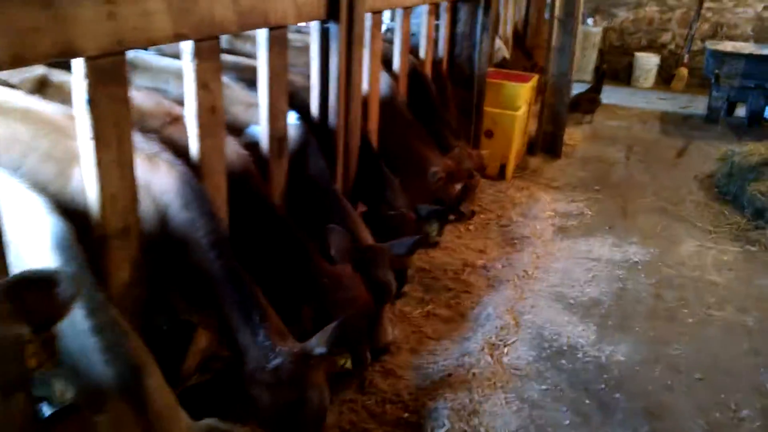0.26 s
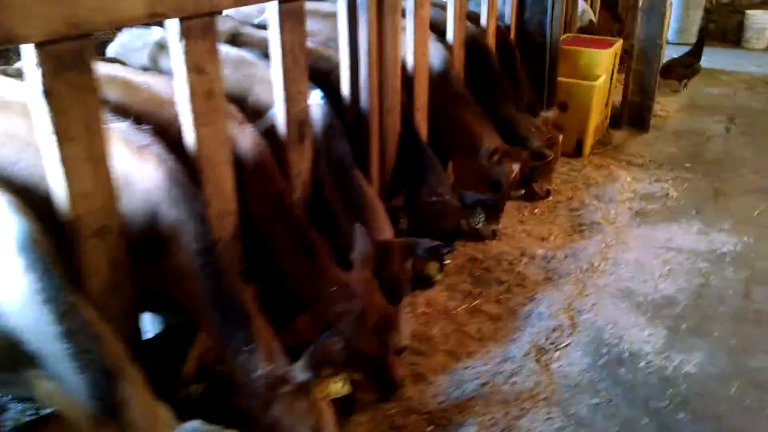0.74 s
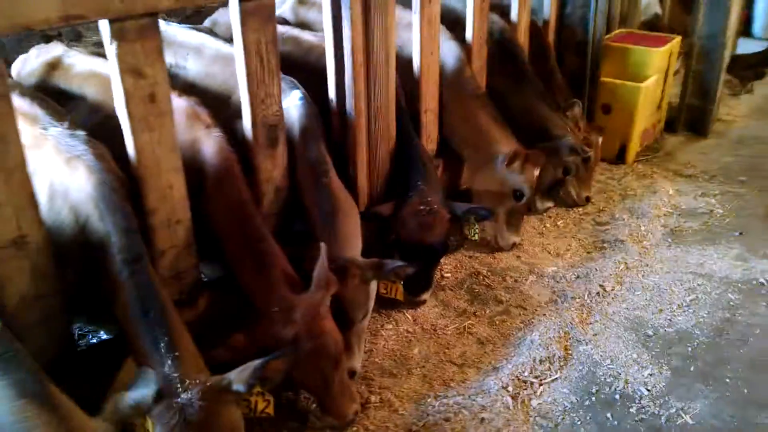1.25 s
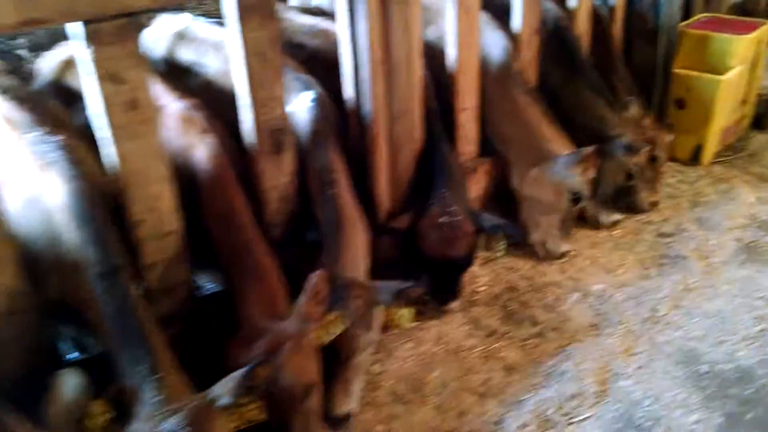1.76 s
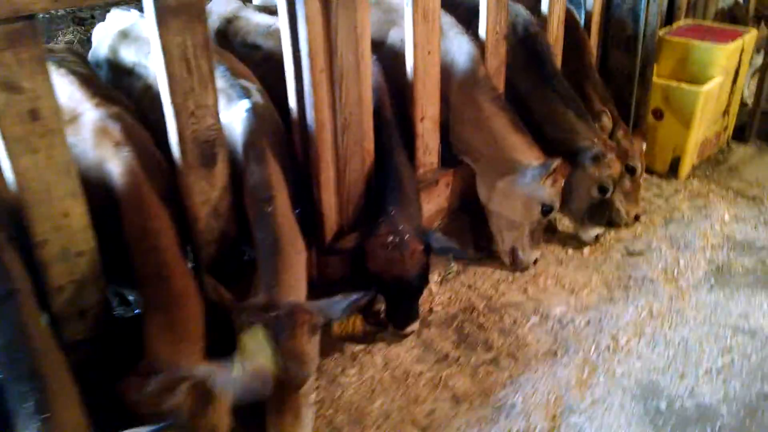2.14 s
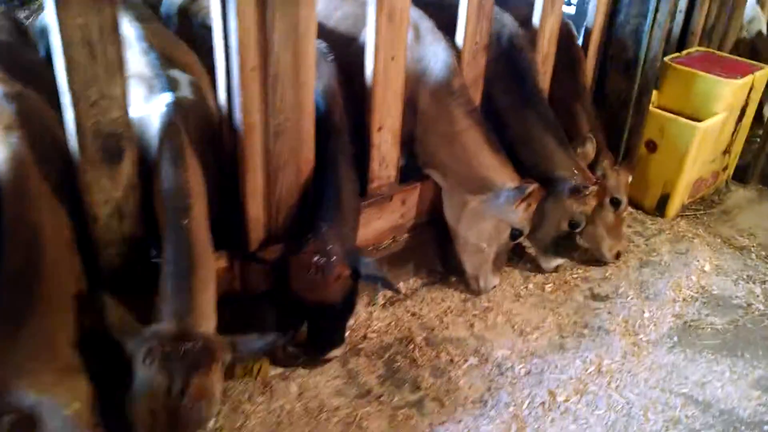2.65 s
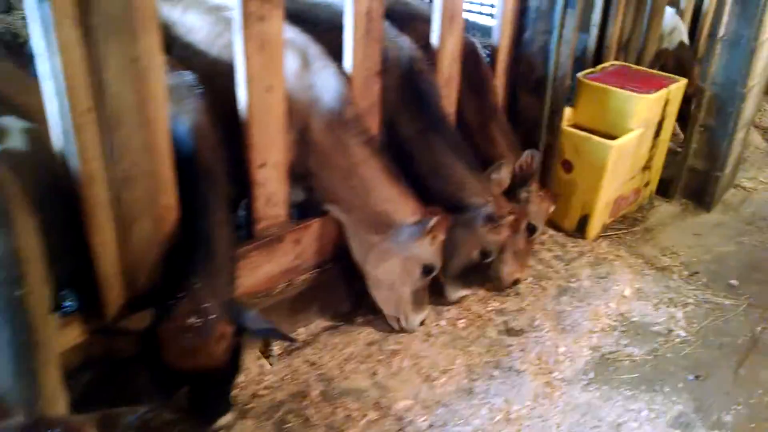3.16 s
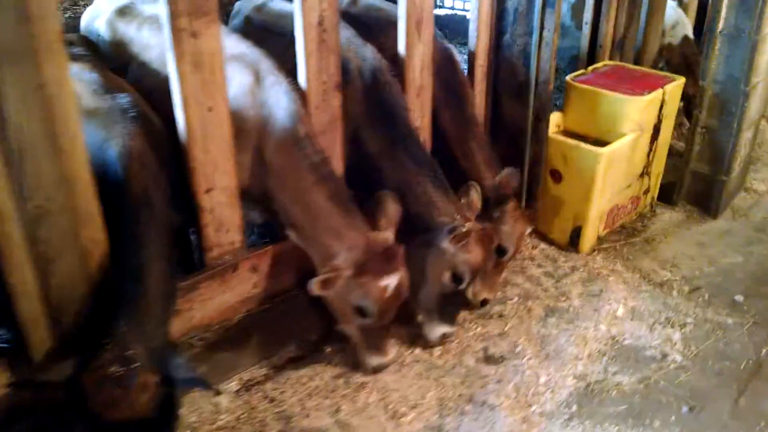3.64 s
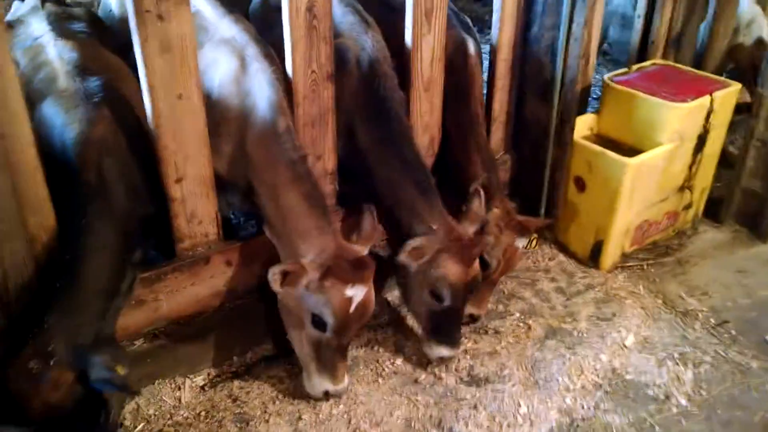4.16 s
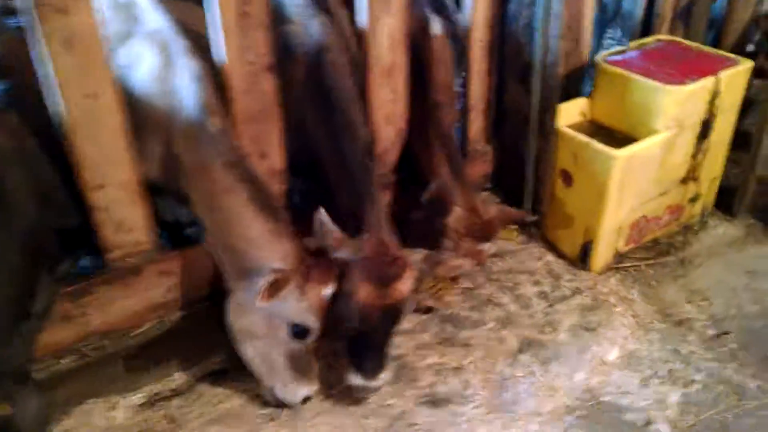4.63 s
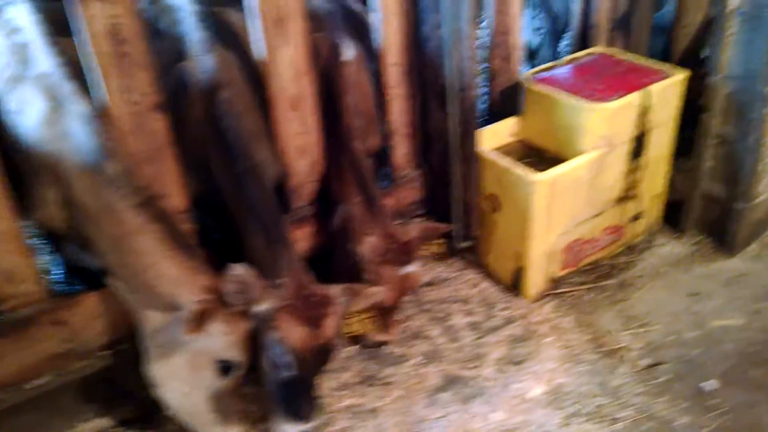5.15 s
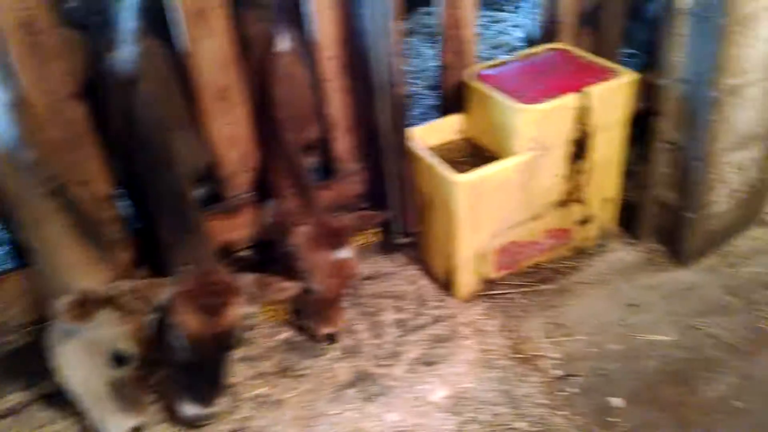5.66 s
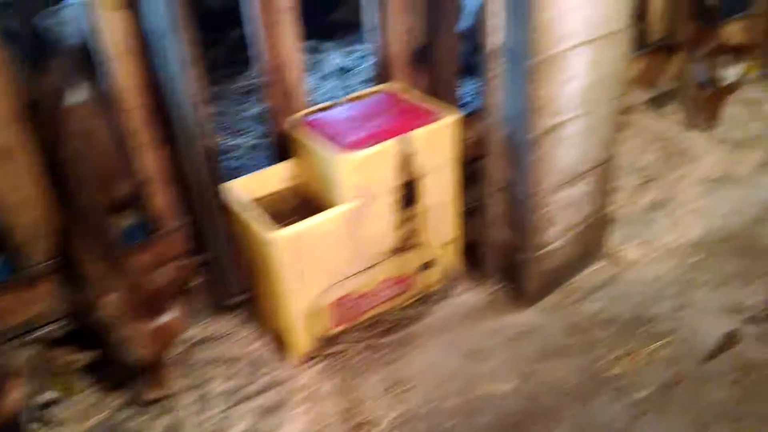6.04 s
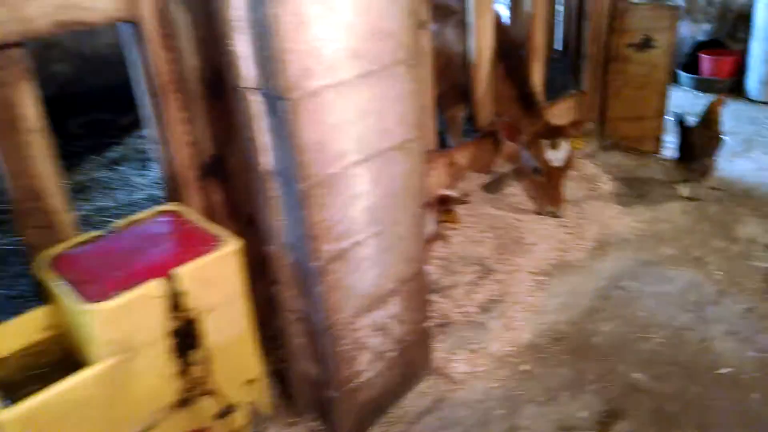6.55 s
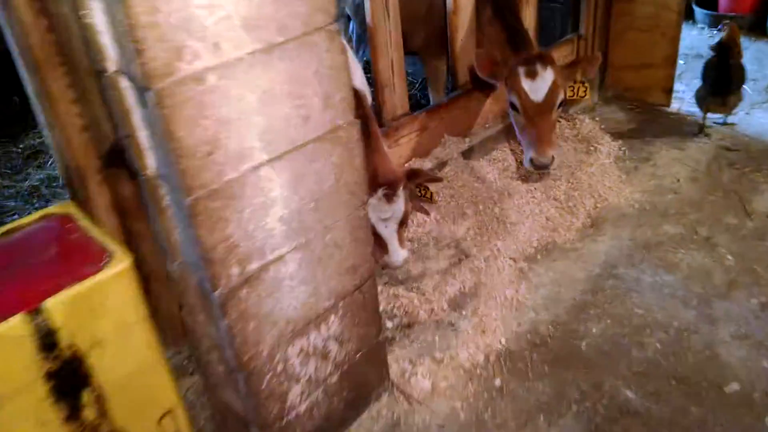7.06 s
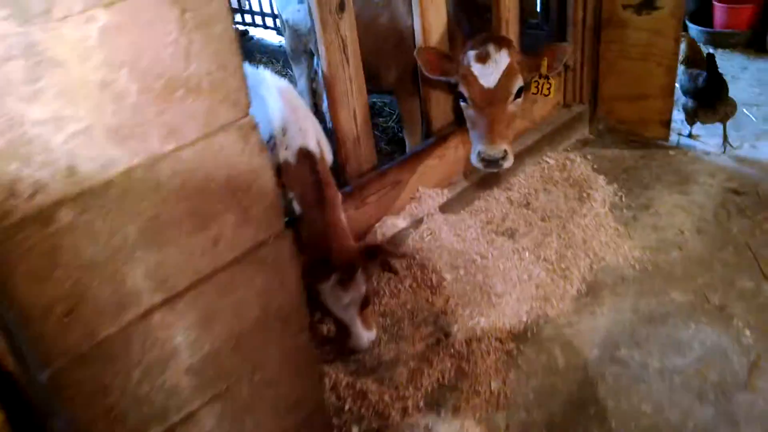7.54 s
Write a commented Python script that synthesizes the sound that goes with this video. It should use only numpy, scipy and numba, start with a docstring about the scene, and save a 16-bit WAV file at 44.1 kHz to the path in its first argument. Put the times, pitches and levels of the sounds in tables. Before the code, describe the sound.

A calf gives a long rising moo in a timber barn, with a faint answer and a short rough call, amid straw rustle and knocks.

```python
"""Calves moo in a timber barn: a long call, a fainter answer, a short call; pulse trains ring moving resonances.
A hum precedes the short call; a far calf grunts, one snorts, boards knock, dry snaps crack: tones and noise bursts.
The herd stirs and rustles in feed and straw (coloured noise), small birds chirp (gliding sines).
Air buffets the two microphone ports (bass noise and short swirls) over barn air.
The phone widens its stereo by feeding each port, late and inverted, into the other side."""
import sys
import numpy as np
from scipy import signal
from scipy.fft import rfft, irfft, next_fast_len
from scipy.io import wavfile
from scipy.ndimage import uniform_filter1d
from numba import njit

SR = 44100
rng = np.random.default_rng(int(sys.argv[2]) if len(sys.argv) > 2 else 0)


def gain_from_db(level_db):
    """Turn a decibel level (scalar or array-like) into a linear amplitude factor."""
    decades = np.asarray(level_db, float) / 20
    return 10 ** decades


def generate_wav(sig):
    """Save sig (samples, or channels by samples) to the path in sys.argv[1] as 16-bit PCM at SR."""
    pcm = np.round(np.clip(np.atleast_2d(sig).T, -1, 1) * 32767).astype(np.int16)
    wavfile.write(sys.argv[1], SR, pcm)


N = 343980
T = np.arange(N) / SR
SIZE = next_fast_len(N)

# calls, before group offsets: (time [s], mean pitch [Hz], throat [dB], mouth [dB], bray [dB])
LONG_MOO = [(1.02, 88.6, -59, -51, -67), (1.18, 97.2, -47, -32.5, -54), (1.27, 102.1, -24, -33, -41),
            (1.35, 105.3, -36, -36, -34), (1.41, 109, -23.5, -32, -34.5), (1.52, 113.2, -27.5, -30, -31),
            (1.69, 119.3, -20, -27.5, -33.5), (1.91, 129.7, -24.5, -28.5, -27.5),
            (1.99, 132.1, -13.5, -18.5, -31.5), (2.05, 133.8, -16, -31.5, -25.5),
            (2.18, 134.6, -18, -22, -24), (2.27, 133.1, -21, -29.5, -40), (2.36, 135.1, -27, -23.5, -29.5),
            (2.53, 143.6, -14, -21.5, -30), (2.6, 147, -12, -22, -33.5), (2.655, 149.7, -22, -42, -34),
            (2.7, 149.4, -12.5, -23.5, -29.5), (2.745, 152.5, -24.5, -33, -35), (2.8, 154.7, -14, -26, -29),
            (2.88, 156.3, -19.5, -29.5, -30), (2.98, 156.8, -16, -24, -25), (3.08, 157.4, -22.5, -29, -29),
            (3.15, 158.5, -11.5, -25, -28.5), (3.22, 158.3, -11.5, -24.5, -37),
            (3.27, 158.2, -10, -26, -41.5), (3.37, 159.8, -18.5, -28.5, -30),
            (3.42, 158.5, -11.5, -33.5, -32), (3.47, 157.5, -15, -29.5, -30), (3.53, 158, -11.5, -39, -29),
            (3.56, 158.3, -23, -27, -29), (3.585, 158, -11.5, -29, -29), (3.65, 160.4, -22, -27, -29),
            (3.72, 155.6, -13, -27, -30.5), (3.745, 152.4, -9.5, -32, -25.5), (3.766, 150.4, -35, -26, -37),
            (3.795, 148, -6.5, -21, -44), (3.82, 145.8, -9.5, -36, -37), (3.85, 142.8, -22, -19, -29.5),
            (3.878, 139.8, -11.5, -23, -32), (3.93, 135.8, -26, -21, -41), (3.98, 136, -34.5, -47, -57),
            (4.07, 136, -21, -49, -56)]
ANSWER = [(3.96, 178.6, -22, -44, -43), (4.03, 184.6, -42, -33, -38), (4.1, 192, -35, -34.5, -34.5),
          (4.2, 187.3, -36.5, -35.5, -38.5), (4.3, 187.1, -30, -36.5, -39),
          (4.47, 183.1, -22.5, -38, -34.5), (4.495, 181.9, -23, -43, -38), (4.508, 178.1, -28, -40, -35),
          (4.525, 169, -24, -32, -34), (4.545, 163.3, -29, -37, -35), (4.58, 157.2, -21, -34, -38),
          (4.6, 152, -29, -45, -41), (4.63, 150.2, -26, -40, -48), (4.662, 153, -22, -46, -50),
          (4.675, 151, -37, -52, -54), (4.72, 150.5, -47, -47, -46)]
SHORT_MOO = [(4.785, 132, -31, -43, -44), (4.81, 132.9, -36, -40, -33), (4.825, 134.1, -31, -32, -28),
             (4.848, 134.3, -32, -28, -23), (4.948, 137.8, -28.5, -33, -22), (5.09, 138.3, -27.5, -23, -23),
             (5.198, 139.9, -29.5, -22.5, -23), (5.28, 134.3, -23.5, -26.5, -23.5),
             (5.32, 124.8, -27.5, -39, -31), (5.352, 122.5, -26.5, -33, -38), (5.46, 117.4, -38, -55, -60),
             (5.57, 115.1, -45, -55, -67)]
# lowest partial through all calls, before group offsets: (time [s], level [dB])
CHEST = [(1.0, -35), (1.3, -29.5), (1.7, -37.5), (1.95, -29), (2.3, -31.5), (2.5, -42), (3.2, -42),
         (3.6, -28), (3.9, -32), (4.0, -38), (4.3, -34), (4.7, -34.5), (4.85, -27), (5.25, -30.5),
         (5.35, -35), (5.5, -58)]
# upper resonances, before group offsets, in two successive parts: (time [s], nose [dB], rasp [dB])
UPPER = [
    [(1.02, -64, -70), (1.13, -51, -70), (1.37, -42.5, -42), (1.66, -35.5, -38), (1.75, -39, -37),
     (1.82, -27, -38.5), (1.92, -50, -37), (2.02, -33, -39), (2.05, -42, -38.5), (2.17, -26.5, -39.5),
     (2.24, -53, -48), (2.28, -44, -41), (2.3, -49, -44.5), (2.41, -24.5, -40), (2.48, -35, -39),
     (2.6, -30, -41), (2.68, -56, -43), (2.74, -30.5, -45.5), (2.86, -33.5, -41), (3.16, -29, -41),
     (3.23, -33, -39.5), (3.29, -50, -43), (3.33, -28, -39.5), (3.4, -38, -43.5), (3.69, -30.5, -39),
     (3.93, -38.5, -51), (3.97, -44, -56), (4.21, -44, -54), (4.35, -37, -46), (4.79, -51, -47)],
    [(4.795, -44, -39), (4.81, -36, -38), (4.828, -30, -32.5), (4.857, -24, -29), (4.913, -30, -29.5),
     (4.937, -27, -29), (4.987, -32, -29.5), (5.043, -32, -27.5), (5.059, -38, -37), (5.111, -27, -29.5),
     (5.175, -32, -36), (5.203, -29, -31.5), (5.235, -32, -29.5), (5.253, -26.5, -33), (5.351, -31, -31.5),
     (5.377, -48, -39), (5.405, -44, -48), (5.455, -50, -57), (5.5, -52, -76)],
]
# six groups per calf (chest, throat, mouth, nose, bray, rasp) of
# (centre [Hz], width per pass [Hz], relative level [dB]); mouth, bray, rasp: centre [multiple of moving centre]
LONG_TRACT = [
    [(140, 80, 0)],
    [(285, 120, 0)],
    [(1, 150, 0), (1.2, 300, -12)],
    [(1105, 120, 0), (1250, 300, -12)],
    [(1, 130, 0), (.9, 250, -9), (1.18, 250, -11), (1.32, 220, -10)],
    [(.84, 500, 1), (1, 380, 1), (1.15, 700, -4.5), (1.36, 350, -9), (1.72, 500, -12)],
]
ANSWER_TRACT = [
    [(190.5, 71, 0.49)],
    [(333.7, 101, 0)],
    [(1, 176, 0)],
    [(1109, 330, 1)],
    [(0.99, 730, 0)],
    [(.95, 2070, 0)],
]
SHORT_TRACT = [
    [(140.4, 19, 0)],
    [(284, 95, 0.5), (362, 73, 1.5), (417, 53, -3.5)],
    [(0.98, 280, -1.5), (0.767, 120, -5.5)],
    [(1248, 270, 0)],
    [(1, 300, 0.25), (1.23, 298, 0.67)],
    [(.88, 299, 10.5), (1, 400, 10.5), (1.12, 500, 9), (1.22, 493, 5), (1.39, 510, -2), (1.6, 700, -4.5)],
]
# offset of each of the six groups [dB]
LONG_GROUPS_DB = [-2.5, 1.5, -2, -0.5, -2.5, 4.5]
ANSWER_GROUPS_DB = [2.5, 4.5, 1.5, 1, -5, 6]
SHORT_GROUPS_DB = [-3, 4, -1.1, -1.5, -7.5, 1.5]
# resonance centres moved by the jaw: (time [s], centre [Hz])
MOUTH_HZ = [(1.0, 726), (1.35, 683), (1.5, 615), (1.6, 666), (1.86, 716), (1.95, 668), (2.3, 657),
            (2.6, 753), (2.76, 767.5), (2.84, 624), (3.32, 643), (3.39, 796), (3.63, 820), (3.7, 637),
            (3.84, 706), (3.98, 679), (4.08, 737), (4.5, 760), (4.78, 730), (4.95, 740), (5.05, 864),
            (5.18, 910), (5.28, 855), (5.5, 780)]
BRAY_HZ = [(1.0, 1400), (1.9, 1490), (2.2, 1463), (2.6, 1550), (2.85, 1553), (3.1, 1565), (3.7, 1588),
           (3.9, 1552), (4.7, 1600), (4.8, 1790), (5.1, 1850), (5.25, 1790), (5.5, 1600)]
RASP_HZ = [(1.0, 3130), (1.5, 3000), (1.9, 3062), (2.2, 3200), (2.45, 3362), (2.65, 3310), (2.9, 3150),
           (3.7, 3161), (4.75, 3097), (4.85, 3086), (5.05, 3136), (5.2, 3230), (5.5, 3120)]
# unevenness of the vocal-fold beat: (time [s], roughness [0-1])
ROUGHNESS = [(1.0, .25), (1.4, .07), (1.9, .055), (2.6, .05), (2.8, .03), (3.3, .03), (3.335, .13),
             (3.37, .03), (3.68, .035), (3.9, .08), (4.0, .16), (4.12, .1), (4.3, .08), (4.45, .08),
             (4.53, .18), (4.75, .24), (4.84, .03), (5.19, .035), (5.25, .26), (5.4, .3), (5.56, .25)]
# closed-mouth hum: (time [s], pitch [Hz], fundamental rms [dB])
HUM = [(4.3, 106.2, -37), (4.45, 116.3, -43.5), (4.568, 121.6, -29), (4.76, 130.4, -32.5), (4.85, 132, -34)]
# far calf: (time [s], level [dB])
GRUNT = [(0.66, -43), (0.664, -42), (0.698, -31), (0.732, -39), (0.83, -37)]
# body of the snort: (start [s], attack [s], hold [s], release [s], level [dB], change over the hold [dB])
SNORT = 6.443, 0.025, 0.115, 0.04, -24.5, -3
# knocks on boards and trough, and the short whistle that opens the snort:
# (time [s], peak [dB], note [Hz], t60 before mode share [s])
KNOCKS = [(.537, -21.5, 416, 0.039), (.617, -29, 570, 0.23), (.81, -38, 1560, .04),
          (0.889, -27, 1526, 0.034), (.987, -32, 700, 0.027), (1.3989, -13, 530, 0.016),
          (2.276, -17.5, 1246, 0.011), (2.78, -47, 1490, 0.079), (2.83, -33, 490, 0.039),
          (2.869, -24, 912, 0.025), (3.326, -21, 931, 0.041), (3.341, -17.5, 1208, 0.046),
          (5.576, -27, 530, 0.048), (5.728, -33, 1720, 0.025), (5.762, -27, 870, 0.086),
          (6.273, -20.5, 316, 0.15), (6.319, -22, 324, 0.083), (6.352, -32, 330, .06),
          (6.386, -33, 510, 0.038), (6.445, -27, 1597, .09), (6.959, -28, 640, 0.035),
          (7.085, -31, 770, 0.037), (7.402, -28, 818, 0.048)]
# board modes: (frequency [multiple of note], level [dB], decay [share of t60])
BOARD_MODES = [(1, 4.5, 0.96), (.55, -10, 0.86), (1.42, 5.5, 0.15), (2.15, -12.5, 0.98), (3.3, -24, 0.48)]
# dry snaps: (time [s], cycle peak [dB], fizz brightness [dB])
SNAPS = [(0.1155, -36, 2), (0.45, -6, -5.5), (1.2772, -24, -2), (2.1965, -16, 2), (2.8674, -15, 6.5),
         (3.86, -11.5, -33), (5.824, -19.5, -17)]
# herd moving about: (time [s], level [dB])
STIR = [(0.0, -39), (0.45, -42.5), (0.688, -36), (1.15, -38.5), (5.4, -33.5), (5.55, -42), (6.34, -47.5),
        (6.44, -36.5), (6.58, -31.5), (6.63, -42), (6.73, -42), (7.3, -41.5), (7.5, -39), (7.65, -43),
        (7.75, -39), (7.8, -40)]
# bed of straw and feed rustling: (time [s], level before flutter [dB])
RUSTLE = [(0.0, -47), (0.46, -39.5), (0.56, -50), (0.82, -41), (1.05, -45.5), (1.5, -39), (2.1, -41),
          (2.85, -45), (3.4, -40.5), (3.93, -46), (4.4, -41), (4.6, -44), (5.05, -39), (5.4, -44.5),
          (5.9, -44.5), (6.15, -38), (6.33, -47.5), (6.78, -45.5), (7.3, -40.5), (7.56, -44), (7.8, -41)]
# straw scuffs, mouthfuls pulled, and the bright hiss of the snort:
# (peak time [s], level [dB], rise per 15 dB [s], fall per 15 dB [s])
SCUFFS = [(0.13, -41, .04, 0.036), (1.26, -39.5, 0.039, 0.091), (1.58, -36.5, 0.083, 0.028),
          (2.201, -19, 0.0097, 0.051), (2.6, -37.5, 0.2, 0.18), (2.87, -38, 0.019, 0.017),
          (3.45, -37.5, 0.071, 0.1), (4.47, -45, .15, 0.032), (5.13, -34, .06, 0.077),
          (5.45, -38, 0.035, 0.019), (5.93, -34, 0.034, 0.017), (6.06, -42, 0.074, 0.087),
          (6.475, -27.5, 0.011, 0.16), (6.56, -22.5, 0.071, 0.062), (6.92, -28, 0.1, 0.23),
          (7.0, -30, 0.12, 0.052), (7.17, -29, 0.02, 0.037), (7.47, -37, 0.5, 0.043)]
# bird chirps: (time [s], length [s], start [Hz], approached end [Hz], level [dB])
CHIRPS = [(6.154, 0.064, 4200, 4500, -44), (6.172, 0.037, 5350, 5480, -36), (6.244, .04, 4700, 4900, -39),
          (6.248, 0.039, 4350, 4120, -45), (7.6, 0.043, 4500, 4800, -43), (7.613, 0.056, 5700, 5530, -36.5),
          (7.62, 0.031, 6300, 6400, -43), (7.685, 0.055, 4400, 4870, -40)]
# strength of the air at the ports: (time [s], level [dB])
BUFFET = [(0.0, -58), (0.9, -53), (1.2, -43), (1.8, -55), (2.2, -46), (2.8, -65), (3.5, -41), (3.9, -59),
          (4.6, -51), (4.8, -33.5), (5.2, -35), (5.5, -46), (5.8, -30.5), (6.2, -39), (6.5, -42),
          (6.8, -39), (7.0, -23), (7.2, -39), (7.4, -30), (7.8, -30)]
# biggest eddies, before port gains: (time [s], level [dB], frequency [Hz])
THUMPS = [(1.192, -17, 80), (4.844, -16, 100), (5.287, -10, 65.5), (5.551, -4, 98.5), (6.072, -8, 64),
          (6.217, -11.5, 58), (6.246, -16, 82), (6.949, -11, 71), (6.981, -10, 101), (7.288, -15, 96),
          (7.467, -7.5, 119), (7.505, -4, 131), (7.523, -4, 119), (7.642, -10, 97), (7.664, -9, 79),
          (7.784, -10, 98)]
# noise spectra: (frequency [Hz], relative density [dB])
SNORT_COLOUR = [(120, 6), (300, 15.5), (600, 7), (1100, 1.5), (1700, 1.5), (2100, -5), (2500, -26),
                (5000, -22)]
STIR_COLOUR = [(80, -11), (300, 1.5), (700, -4.5), (1500, -14.5), (3000, -16), (6000, -63)]
RUSTLE_COLOUR = [(1500, -6), (4000, 2), (7000, 4.5), (10000, 11), (13000, 6), (15000, 0)]
BUFFET_COLOUR = [(15, -19), (50, 4), (100, -5.5), (200, -17.5), (400, -35), (1000, -68)]
BARN_COLOUR = [(30, 7), (100, 7.5), (300, 5), (800, -5.5), (2000, -18.5), (4000, -14.5), (8000, -18),
               (15000, -42)]

WAVER_DB, WAVER_PER_S = 0.7, 10.92
EDDY_OVER_AIR_DB, EDDY_MEAN_HZ = 8, 74.4
BARN_MEAN_DB = -38
ROOM_T60_S, ROOM_DB = 0.55, -4
TOP_HZ = 15500


def unit(x):
    """Scale to rms 1."""
    return x / np.sqrt(np.mean(x ** 2))


def shape(x, points):
    """Zero-phase filter by (frequency [Hz], gain [dB]) points, linear in log frequency."""
    hz, db = np.transpose(points)
    f = np.arange(SIZE // 2 + 1) * SR / SIZE + 1e-3
    gain = gain_from_db(np.interp(np.log(f), np.log(hz), db))
    return irfft(rfft(x, SIZE) * gain, SIZE)[..., :N]


def diffuse(points, alike_hz=520):
    """Noise from all around at two ports: the same in the bass, unrelated in the treble."""
    common, own = rng.standard_normal(N), rng.standard_normal((2, N))
    b, a = signal.butter(1, alike_hz, fs=SR)
    return unit(shape(signal.lfilter(b, a, common - own) + own, points))


def walk(rate_hz, size=N):
    """Random levels held 1 / rate_hz and slewed; rms 1."""
    k = int(SR / rate_hz)
    steps = np.repeat(rng.standard_normal(size // k + 1), k)
    return unit(uniform_filter1d(uniform_filter1d(steps, k), k)[:size])


def at(t, table):
    """Second column of a table, interpolated at times t."""
    return np.interp(t, *np.transpose(table))


def curve(table, quiet_db=-90):
    """Gain over time from (time [s], level [dB]) rows, quiet_db outside them."""
    s, db = np.transpose(table)
    return gain_from_db(np.interp(T, s, db, quiet_db, quiet_db))


@njit
def band(x, hz, width_hz):
    """State-variable band-pass whose centre may move."""
    y, b, l = np.empty(len(x)), 0., 0.
    for i in range(len(x)):
        g, k = np.tan(np.pi * hz[i] / SR), width_hz / hz[i]
        v = (b + g * (x[i] - l)) / (1 + g * (g + k))
        b, l, y[i] = 2 * v - b, l + 2 * g * v, k * v
    return y


def ring(x, hz, width_hz):
    """A resonance applied three times, for dark valleys."""
    hz = hz * np.ones(len(x))
    for _ in range(3):
        x = band(x, hz, float(width_hz))
    return x


def fold_source(pitch_hz, rough):
    """Vocal-fold pulses, their timing and level uneven when rough, plus breath gated by the beat."""
    n = len(pitch_hz)
    jitter = 0.0024 * walk(25.05, n) + 0.244 * rough ** 2 * walk(120, n)
    phase = 2 * np.pi * np.cumsum(pitch_hz * (1 + jitter)) / SR
    # walls and bodies scatter the call: each partial has its own phase and swell
    turns = rng.uniform(0, 2 * np.pi, 46)
    pulses = np.zeros(n)
    for k in range(1, 46):
        swell_db = np.interp(k, [1, 3, 12, 20], [.7, 2, 3, 4]) * walk(14, n)
        pulses += gain_from_db(swell_db) * np.cos(k * phase + turns[k])
    # air hissing through the folds is brighter than their beat
    breath = signal.lfilter([1, -.55], 1, rng.standard_normal(n) * (1 + np.cos(phase)))
    return unit(pulses) * gain_from_db(8 * rough * walk(140, n)) + 6.5 * rough * breath


def moo(table, tract, groups_db):
    """Vocal-fold source rings six groups of resonances, each levelled and then set to its own level curve."""
    s, *columns = np.transpose(table)
    i0, i1 = int(s[0] * SR), int(s[-1] * SR)
    t = T[i0:i1]
    pitch_hz, throat_db, mouth_db, bray_db = (np.interp(t, s, c) for c in columns)
    upper_s, *upper = np.vstack(UPPER).T
    nose_db, rasp_db = (np.interp(t, upper_s, c) for c in upper)
    levels_db = [at(t, CHEST), throat_db, mouth_db, nose_db, bray_db, rasp_db]
    centres = [1, 1, at(t, MOUTH_HZ), 1, at(t, BRAY_HZ), at(t, RASP_HZ)]
    waver_shares = [1, .4, 1, 1, 1, 1]
    source = fold_source(pitch_hz, at(t, ROUGHNESS))
    out = np.zeros(N)
    for group, centre, level_db, group_db, share in zip(tract, centres, levels_db, groups_db, waver_shares):
        sound = sum(gain_from_db(db) * ring(source, f * centre, width_hz) for f, width_hz, db in group)
        steady = sound / np.sqrt(uniform_filter1d(sound ** 2, size=4000) + 1e-9)
        db = level_db + group_db + share * WAVER_DB * walk(WAVER_PER_S, len(t))
        out[i0:i1] += steady * gain_from_db(db) * signal.windows.tukey(len(t), .04)
    return out


def hum():
    """Mouth shut: the fundamental and a weak octave."""
    s, hz, db = np.transpose(HUM)
    phase = 2 * np.pi * np.cumsum(np.interp(T, s, hz)) / SR
    level = uniform_filter1d(curve(np.c_[s, db]), size=1500)
    return np.sqrt(2) * level * (np.sin(phase) + .3 * np.sin(2 * phase))


def grunt():
    """Too far off for a pitch: only the throat resonance carries, rung by noise."""
    level = uniform_filter1d(curve(GRUNT), size=600)
    return level * unit(ring(rng.standard_normal(N), 285.0, 54))


def snort():
    """Body of the snort: one blow of coloured, fluttering noise."""
    s, attack, hold, release, db, sag_db = SNORT
    full = s + attack
    sagged = full + hold
    blow = curve([(s, db - 7), (full, db), (sagged, db + sag_db), (sagged + release, db - 18)])
    return blow * unit(diffuse(SNORT_COLOUR) * gain_from_db(2 * walk(130)))


def knocks():
    """Damped modes over a note, struck by a short uneven scrape of hoof or horn; also the snort's whistle."""
    out, t = np.zeros(N + 8800), T[:8000]
    for s, db, hz, t60 in KNOCKS:
        modes = np.zeros(len(t))
        for multiple, mode_db, share in BOARD_MODES:
            decay_db = -60 * t / (max(t60, .01) * share)
            modes += gain_from_db(mode_db + decay_db) * np.sin(2 * np.pi * hz * multiple * t)
        scrape = rng.standard_normal(800) * np.exp(-T[:800] / (.16 * t60))
        sound = signal.fftconvolve(modes, scrape)
        out[int(s * SR):int(s * SR) + len(sound)] += gain_from_db(db) * sound / np.abs(sound).max()
    return out[:N]


def snaps():
    """One sharp cycle with a brief fizz on top."""
    out, t = np.zeros(N), T[:400]
    for s, db, bright_db in SNAPS:
        cycle = np.cos(2 * np.pi * 1300 * t) * np.exp(-t / 0.00019)
        grit = uniform_filter1d(rng.standard_normal(400), size=3)
        fizz = gain_from_db(bright_db + 4) * grit * np.exp(-t / 0.0005)
        out[int(s * SR):int(s * SR) + 400] += gain_from_db(db) * (cycle + fizz)
    return out


def stir():
    """The herd moving about: dull noise with uneven level."""
    return curve(STIR) * unit(diffuse(STIR_COLOUR) * gain_from_db(1.06 * walk(25)))


def rustle():
    """Feed and straw, and the snort's hiss: grainy bright noise, bed and scuffs added in power."""
    grains = gain_from_db(1.216 * walk(60) + 0.48 * walk(400))
    bed = curve(RUSTLE) * gain_from_db(1.07 * walk(12))
    scuff_power = np.zeros(N)
    for s, db, rise_s, fall_s in SCUFFS:
        below_peak_db = 15 * np.maximum((s - T) / rise_s, (T - s) / fall_s)
        scuff_power += gain_from_db(db - below_peak_db) ** 2
    return np.sqrt(bed ** 2 + scuff_power) * unit(diffuse(RUSTLE_COLOUR) * grains)


def chirps():
    """Short hoarse notes, often two at once, that glide fast and level off."""
    out = np.zeros(N)
    for s, length_s, hz0, hz1, db in CHIRPS:
        n = int(length_s * SR)
        glide_hz = hz0 + (hz1 - hz0) * np.tanh(np.linspace(0, 2.5, n))
        hz = glide_hz * (1 + .012 * walk(600, n))
        hoarse = gain_from_db(3 * walk(200, n))
        note = np.sin(2 * np.pi * np.cumsum(hz) / SR)
        out[int(s * SR):int(s * SR) + n] += gain_from_db(db) * np.sqrt(np.hanning(n)) * hoarse * note
    return out


def buffet():
    """A rumble of small eddies, and big ones that push one port in as they pull the other out."""
    eddies = rng.standard_normal((2, N)) * gain_from_db(3.5 * np.array([walk(70), walk(70)]))
    rumble = curve(BUFFET) * unit(shape(eddies - 0.044 * eddies[::-1], BUFFET_COLOUR))
    when, size, pitch = rng.uniform(0, 1, (60, 3)).T
    when_s = .05 + when * (N / SR - .1)
    lesser_db = at(when_s, BUFFET) + EDDY_OVER_AIR_DB + 12 * (size - .5)
    lesser = np.c_[when_s, lesser_db, EDDY_MEAN_HZ * (.75 + .5 * pitch)]
    big = np.zeros(N)
    for s, db, hz in np.r_[lesser, THUMPS]:
        start = int(s * SR) - 1200
        cycles = hz * (T[start:start + 2400] - s)
        swirl = np.exp(-(cycles / 0.38) ** 2) * np.cos(2 * np.pi * cycles + rng.uniform(0, 2 * np.pi))
        big[start:start + len(cycles)] += gain_from_db(db) * swirl
    return rumble + big * np.array([[.75], [-.25]])


def barn_air():
    """Diffuse coloured noise that swells slowly."""
    return gain_from_db(BARN_MEAN_DB + 2 * walk(5)) * diffuse(BARN_COLOUR)


def barn_tail():
    """Echo of the barn at both ports: decaying diffuse noise that starts after 6 ms."""
    n = int(1.2 * SR)
    noise = diffuse([(60, -19), (330, -11), (550, -8), (2000, -5.5), (8000, -7)], alike_hz=200)[:, :n]
    tail = noise * gain_from_db(-60 * T[:n] / ROOM_T60_S) * (T[:n] > .006)
    return gain_from_db(ROOM_DB) * tail / np.sqrt(np.mean(np.sum(tail ** 2, axis=1)))


def scene():
    """Calves, knocks, snaps and chirps reach both ports directly and again through the barn."""
    calves = moo(LONG_MOO, LONG_TRACT, LONG_GROUPS_DB)
    calves += moo(ANSWER, ANSWER_TRACT, ANSWER_GROUPS_DB)
    calves += moo(SHORT_MOO, SHORT_TRACT, SHORT_GROUPS_DB)
    calves += hum() + grunt()
    small = knocks() + snaps()
    tail = barn_tail()
    sent = calves + 0.5 * small + 0.37 * chirps()
    room = signal.fftconvolve(sent[None], tail, axes=1)[:, :N]
    # calves stand nearer the second port; bass bends round the phone to the first,
    # where the calves' share is strongest around 2.5 kHz
    first = shape(np.roll(calves, shift=1), [(350, -3.5), (800, -2.5), (1800, -43), (2500, 18.5), (3300, -29)])
    direct = np.array([first, calves]) + small + chirps() * np.array([[.4], [1]])
    herd = stir() + rustle() + snort()
    return direct + room + herd + barn_air() + buffet()


def band_limit(x):
    """A steep low-pass at the top of the band."""
    return signal.sosfilt(signal.butter(12, 16220, fs=SR, output="sos"), x)


def record(dry):
    """First port in the phone's shadow; each side subtracts the other port, late; the top is cut."""
    shadow = [(700, 0), (1800, -5), (2500, -17), (3300, -8), (7000, -13), (15000, -11)]
    shaded = np.array([shape(dry[0], shadow), dry[1]])
    # 17.25 samples = .39 ms
    late = np.exp(-2j * np.pi * np.arange(SIZE // 2 + 1) / SIZE * 17.25)
    other = irfft(rfft(shaded[::-1], SIZE) * late, SIZE)[:, :N]
    # the first port is subtracted less around 2.5 kHz
    other[1] = shape(other[1], [(1800, 0), (2500, -12), (3300, 0)])
    cross = [(60, -3.5), (500, -10.0), (2500, 0.14), (4000, -5.5), (7500, -6.0), (13000, -1.5)]
    wide = shaded - shape(other, cross)
    low_pass = signal.ellip(10, .2, 60, TOP_HZ, fs=SR, output="sos")
    mix = signal.sosfilt(low_pass, wide)
    return band_limit(mix)


dry = scene()
out = record(dry)
generate_wav(out)
```